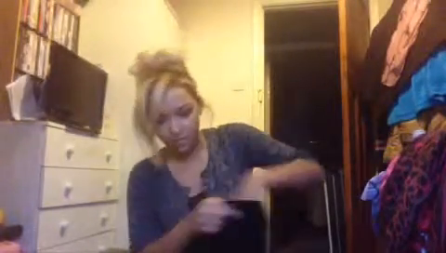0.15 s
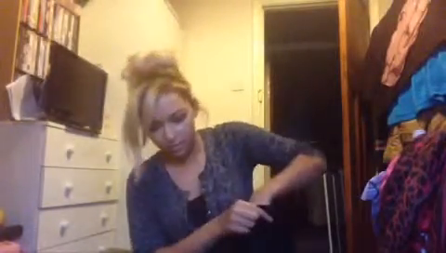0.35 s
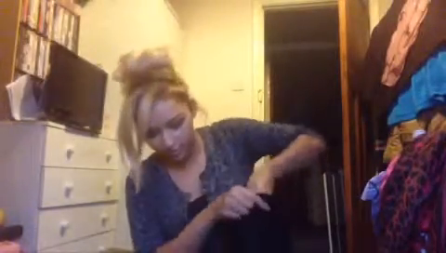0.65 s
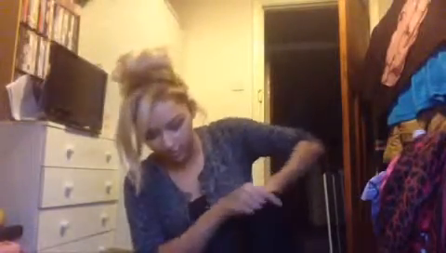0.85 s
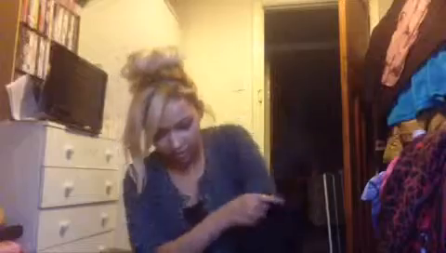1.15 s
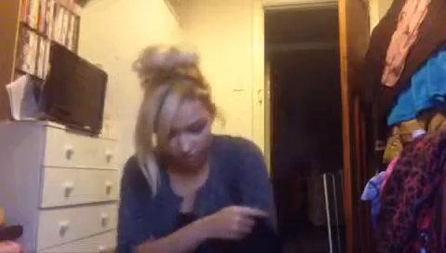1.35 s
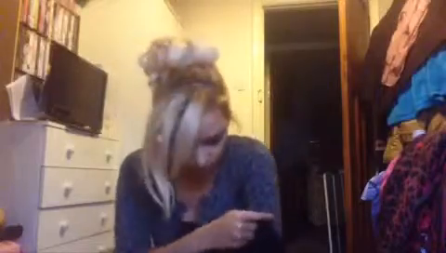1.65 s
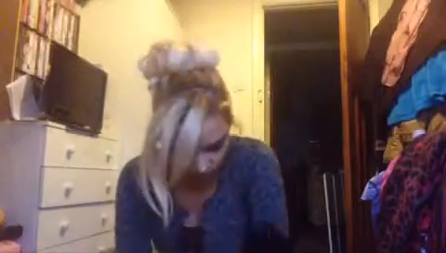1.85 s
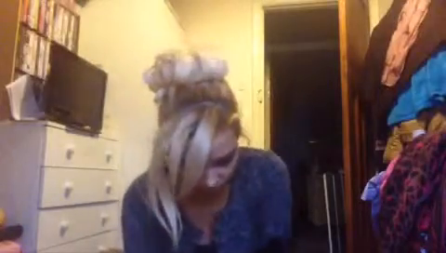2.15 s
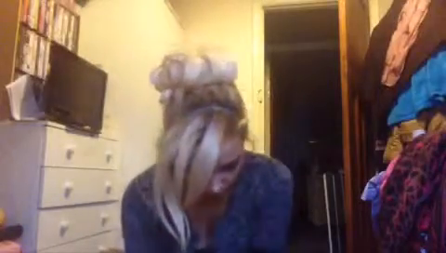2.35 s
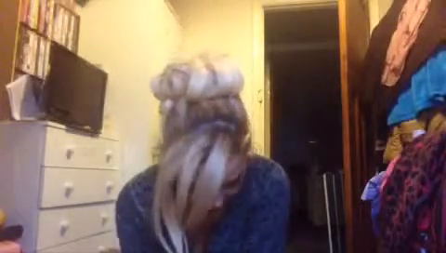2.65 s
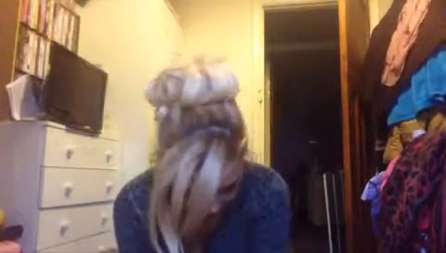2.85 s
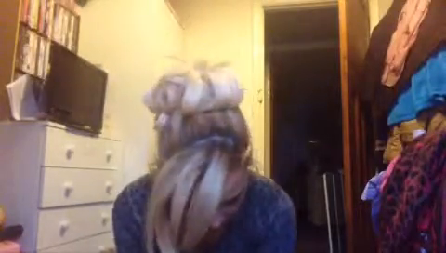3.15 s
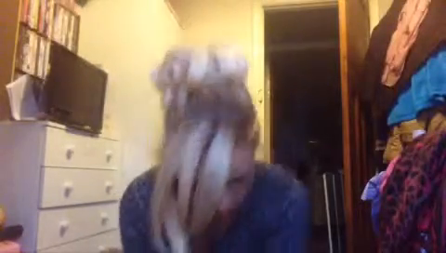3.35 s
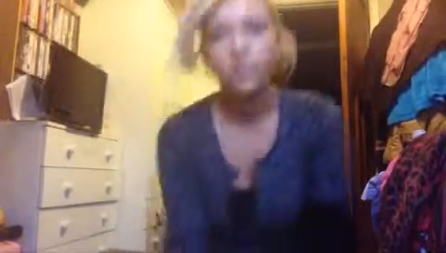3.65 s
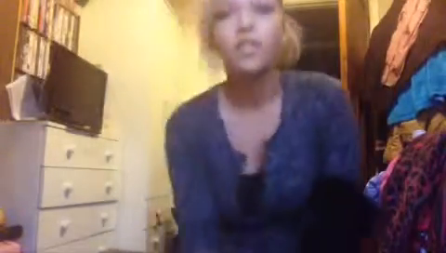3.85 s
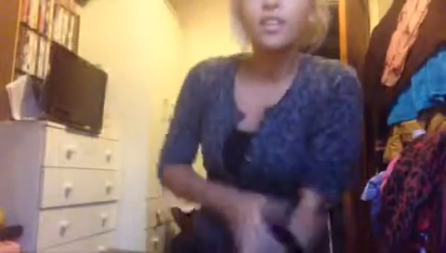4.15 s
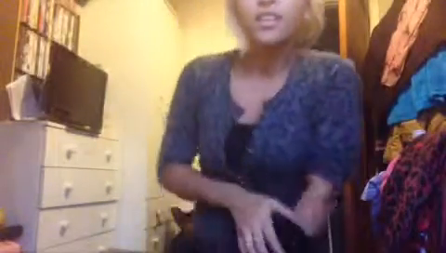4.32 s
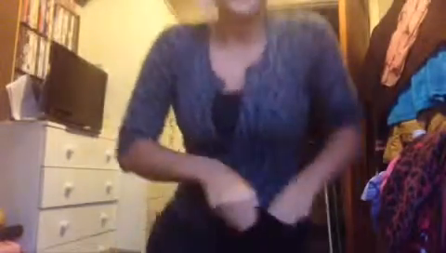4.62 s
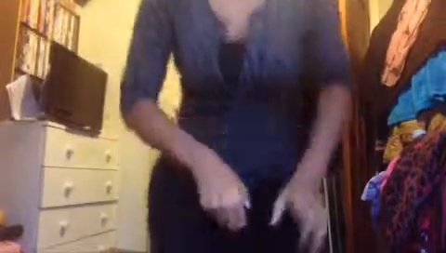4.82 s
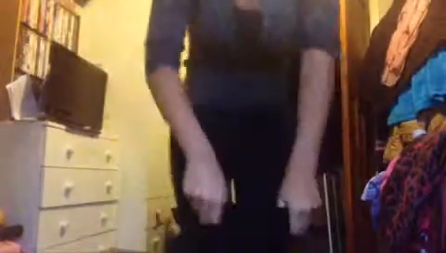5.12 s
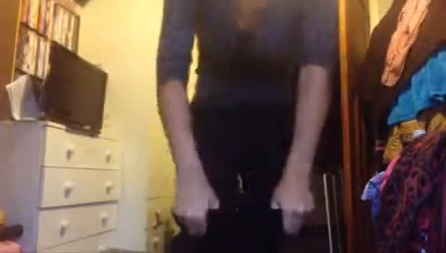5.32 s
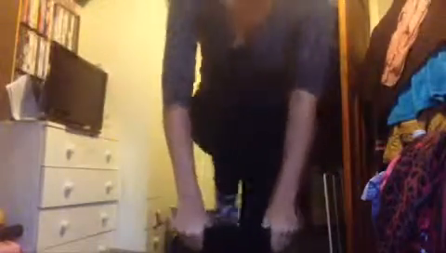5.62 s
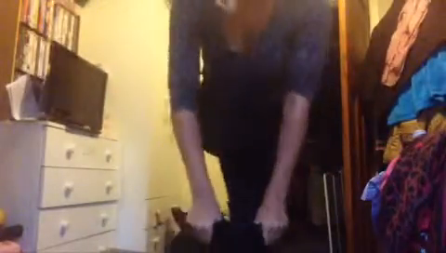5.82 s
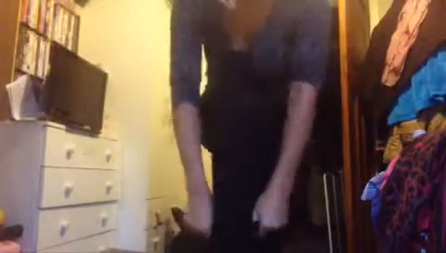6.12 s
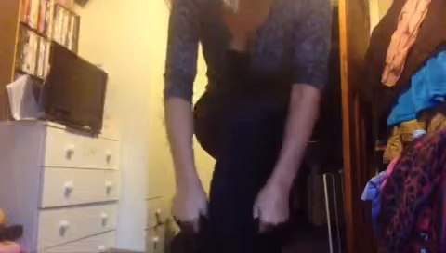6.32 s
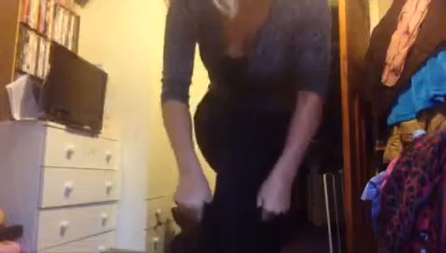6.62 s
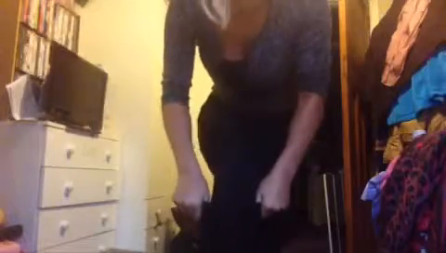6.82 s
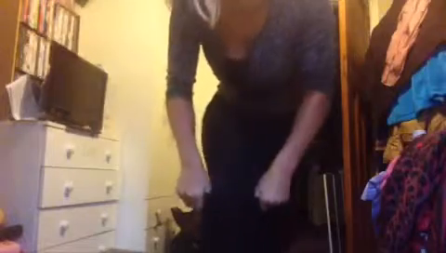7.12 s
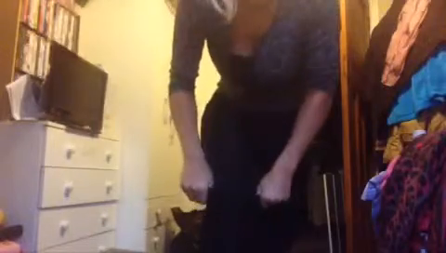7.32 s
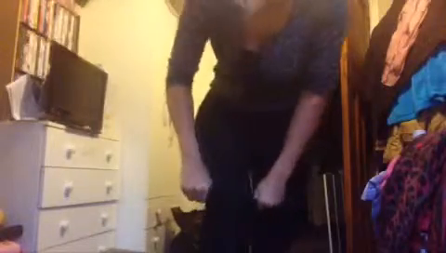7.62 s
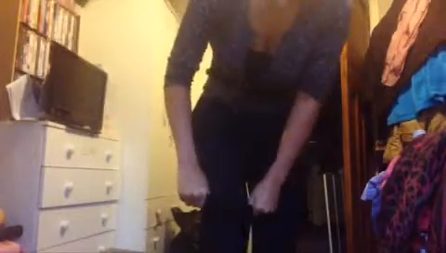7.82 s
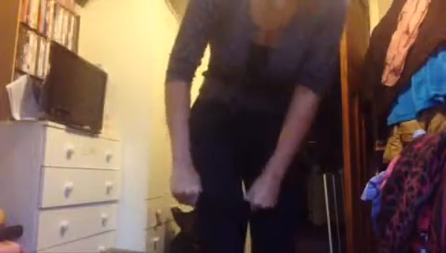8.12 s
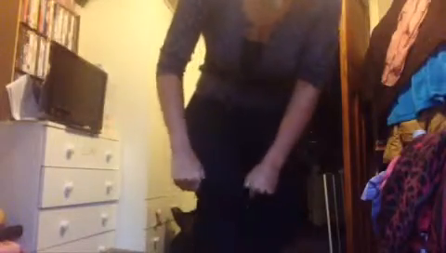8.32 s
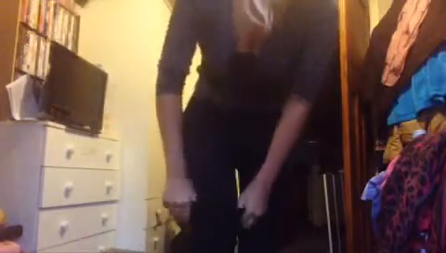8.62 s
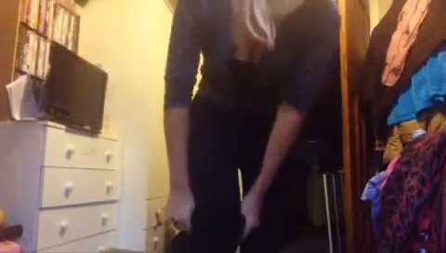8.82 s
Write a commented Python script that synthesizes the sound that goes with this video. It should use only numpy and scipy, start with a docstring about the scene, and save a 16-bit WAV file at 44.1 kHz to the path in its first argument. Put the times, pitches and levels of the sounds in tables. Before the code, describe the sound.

A loud zip rips at once, then cloth rustles and stiff leather creaks with handling knocks, one heavy thud midway and hard knocks later.

```python
"""Someone pulls on boots in a small bedroom, near a built-in microphone that hisses faintly.
From the start cloth and leather rustle and creak (filtered random slips); a zip is ripped along at 0.1 s.
Boot knocks (ringing modes) begin at 0.3 s, high ticks (short sines) at 1.1 s; short zip pulls follow
at 2 s and 3.9 s and a heavy knock at 4.2 s. Rubbing is strongest from 6.1 s, with hard knocks
at 6.9-7.5 s; then cloth and leather go on to the end with a few lighter knocks."""
import sys
import numpy as np
from scipy import signal
from scipy.fft import rfft, irfft, next_fast_len
from scipy.io import wavfile
from scipy.ndimage import uniform_filter1d

SR = 44100
rng = np.random.default_rng(int(sys.argv[2]) if len(sys.argv) > 2 else 0)


def wav_record(signal):
    """Record a signal, one row per channel, as 16-bit PCM in the file named by sys.argv[1]."""
    frames = np.transpose(np.atleast_2d(signal))
    bounded = np.clip(frames, -1, 1)
    # unit amplitude maps onto the largest positive 16-bit level
    quanta = np.round(bounded * 32767).astype(np.int16)
    wavfile.write(sys.argv[1], SR, quanta)


N = 395575

# Cloth strokes: (start [s], swell before it [dB/s], hold [s], rub level [dB], fuzz level [dB])
CLOTH_STROKES = [(0.0, 200, 0.087, -78.5, -76.5), (0.30, 200.5, 0.046, -67, -71),
                 (0.395, 345, 0.0086, -62.5, -57.5), (0.60, 155, 0.097, -72.5, -74.5),
                 (0.82, 200, 0.032, -66, -67), (0.99, 252, 0.11, -62, -64), (1.15, 197, 0.21, -65, -67),
                 (1.50, 120, 0.027, -68, -69), (1.62, 120, 0.055, -66.5, -71),
                 (1.78, 150, 0.092, -69.5, -75.5), (2.15, 131, .40, -67.5, -67.5),
                 (2.55, 102, 0.068, -67.5, -70), (2.71, 120, 0.015, -64.5, -65.5),
                 (2.80, 200, 0.25, -64.5, -66), (3.13, 200, 0.093, -74.5, -74.5),
                 (3.40, 296, 0.011, -69, -75), (3.54, 109, 0.058, -69.5, -62.5),
                 (3.64, 200, 0.049, -63, -68), (3.77, 150, 0.072, -59, -62.5), (4.00, 193, 0.038, -70, -74),
                 (4.18, 96, .05, -61, -65.5), (4.24, 200, 0.031, -60.5, -59),
                 (4.38, 200, 0.031, -65.5, -66), (4.57, 140, .05, -61, -58.5), (4.74, 152, 0.043, -63, -66),
                 (4.89, 150, 0.044, -65.5, -65.5), (4.97, 300, 0.071, -61, -59),
                 (5.13, 200, 0.019, -73, -68.5), (5.24, 200, .17, -73.5, -74),
                 (5.51, 150, 0.024, -76, -71.5), (5.844, 602, 0.024, -65.5, -63),
                 (5.93, 200, .19, -65, -66), (6.144, 450, .20, -54.5, -58.5), (6.38, 200, 0.11, -60, -60.5),
                 (6.55, 55, 0.073, -51.5, -55.5), (6.79, 100, 0.084, -57, -60.5),
                 (6.92, 200, 0.2, -58.5, -62.5), (7.251, 41, .53, -55, -59.5),
                 (7.86, 198, 0.083, -61.5, -66), (8.01, 200, 0.033, -60, -64.5),
                 (8.21, 250, 0.053, -66.5, -70), (8.36, 100, 0.043, -70, -73),
                 (8.479, 500, 0.0059, -68, -68), (8.54, 200, 0.12, -69.5, -75.5),
                 (8.73, 148, 0.032, -65, -63), (8.81, 150, 0.098, -68.5, -67)]
# Cloth spectra, weave and fine fuzz: (frequency [Hz], relative density [dB per Hz])
WEAVE_SPECTRUM = [(410, -20.5), (700, -11.5), (874, 0), (953, -7), (1080, -5), (1510, -6.5), (1780, -3),
                  (2830, -8.5), (3820, -9.5), (7000, -23.5), (9100, -39), (15400, -120)]
FUZZ_SPECTRUM = [(3500, -13.5), (5500, -3), (8000, -3), (11000, -4), (15500, -3.5)]
# Stiff leather flexing: (time [s], rumble level [dB], creak level [dB], boot hollow pitch [Hz])
LEATHER_FLEX = [(0.0, -67, -75, 650), (0.3, -64.5, -73, 600), (0.7, -73, -74.5, 500),
                (1.3, -65.5, -67, 457), (1.55, -59, -65.5, 358), (2.0, -64, -71, 380),
                (2.6, -58, -62.5, 418), (3.1, -65, -76.5, 695), (3.45, -68, -81.5, 423),
                (3.8, -65.5, -66, 640), (4.29, -63, -62.5, 418), (4.5, -68, -69.5, 645),
                (4.95, -64, -62.5, 530), (5.15, -67.5, -74.5, 580), (5.7, -70.5, -77, 520),
                (5.9, -66.5, -64.5, 520), (6.4, -63, -62, 794), (6.6, -63.5, -60.5, 544),
                (6.95, -66, -68, 480), (7.2, -62, -62, 804), (7.7, -65.5, -67.5, 890), (8.1, -68, -76, 560),
                (8.45, -67, -71.5, 470), (8.7, -71, -73, 493), (8.97, -68, -85, 385)]
# Leather spectra, rumble and creak: (frequency [Hz], relative density [dB per Hz])
RUMBLE_SPECTRUM = [(15, -18.5), (25, -10.5), (48, -0.5), (162, -6.5), (199, -1.5), (240, -10), (325, -11),
                   (382, -6.5), (400, -10.5), (520, -21.5), (880, -120)]
CREAK_SPECTRUM = [(150, -46), (250, -3), (383, -10), (469, -3), (515, -1), (640, -2.5), (820, 0),
                  (1210, -12), (1600, -20), (2080, -25), (3520, -120)]
# Microphone hiss: (frequency [Hz], relative density [dB per Hz])
HISS_SPECTRUM = [(18, -66), (30, -32.5), (92, -13.5), (148, -5), (168, -25), (368, -12.5), (574, -24),
                 (671, -16.5), (1190, -34.5), (15400, -52)]
# Quick slider pulls: (time [s], rise [s], run [s], level [dB], fade over run [dB], t60 [s], tilt [dB/octave])
ZIP_PULLS = [(0.096, 0.021, 0.068, -22, -9.5, 0.2, 0), (1.972, 0.0057, 0.0049, -45, -3, 0.062, -4),
             (3.871, 0.018, 0.054, -43, -9.5, 0.12, -1), (3.944, 0.0027, 0.0056, -43, -13, 0.042, -2)]
# Zip teeth: (frequency [Hz], relative density before tilt [dB per Hz])
ZIP_SPECTRUM = [(59, -6.5), (100, -25.5), (192, 0.5), (332, -17.5), (496, 0), (710, -9.5), (1060, -4),
                (1520, -11), (1790, -2), (2460, -10), (2620, -6.5), (2790, -8), (6770, -5.5), (14500, -10),
                (15400, -15)]
# Boot on floor: (time [s], peak [dB], blow centre [Hz], fall below it [dB/octave], fall above it [dB/octave])
FLOOR_KNOCKS = [(0.3189, -47, 574, 18, 9), (0.83, -46, 650, 6.7, 3), (1.0559, -39, 464, 2, 6.5),
                (1.091, -43, 197, 4.3, 2.4), (1.3245, -48, 447, 2.8, 5), (1.4401, -44, 394, 10, 3.9),
                (1.5186, -42, 352, 15, 20), (1.6881, -45.5, 1250, 6.3, 9), (1.7641, -36.5, 378, 32, 6.3),
                (1.824, -50, 312, 11, 6.5), (1.982, -52, 210, 8, 5), (2.0146, -46.5, 543, 11, 6.5),
                (2.0967, -44.5, 348, 2.8, 19), (2.144, -43.5, 400, 2.3, 3.6), (2.3609, -42, 550, 8.8, 6.9),
                (2.3826, -41, 1740, 3.3, 6.5), (2.454, -49, 171, 7.9, 9.3), (2.4884, -44.5, 795, 3, 1.1667),
                (2.54, -47.5, 600, 8, 9), (2.6147, -50, 230, 6, 13), (2.7194, -35, 170.4, 20, 7.2),
                (2.7278, -38, 890, 5.1, 13), (2.8005, -43.5, 520, 4.6, 8.6), (2.879, -49, 150, 7, 8.1),
                (2.9486, -33.5, 880, 17, 15), (3.049, -34.5, 1130, 4, 3.8), (3.053, -42.5, 165, 12, 11),
                (3.4073, -50.5, 313, 3.2, 6.2), (3.6592, -53, 403, 3.5, 5.4), (3.7623, -43, 165, 7, 3.8),
                (3.8338, -40, 855, 5, 8), (4.208, -17, 137, 6.4, 8.5), (4.2282, -27, 1060, 3.4, 20),
                (4.377, -46.5, 376, 2, 4.3), (4.3999, -43, 910, 4, 12), (4.955, -41.5, 535, 6.2, 8),
                (5.1691, -50, 600, 6.5, 5), (5.4731, -50.5, 217, 5, 6.8), (5.7049, -43, 675, 32, 30),
                (5.838, -46.5, 484, 4, 17), (5.866, -43, 348, 2.6, 8.8), (5.9065, -40, 615, 18, 16),
                (6.0675, -43.5, 145, 1.4, 2.2), (6.231, -41.5, 226, 2.3, 2.4), (6.2576, -39, 676, 8.2, 9.2),
                (6.5445, -39, 586, 4.5, 13), (6.585, -37, 705, 2.3, 8), (6.743, -46, 118, 4.4, 19),
                (6.7963, -34, 360, 2, 4.6), (6.8537, -21.5, 520, 6.4, 2.3), (6.858, -36.5, 97, 17, 11),
                (7.076, -38.5, 775, 12, 4.8), (7.166, -36.5, 830, 8.6, 11), (7.271, -43, 1196, 12, 9),
                (7.3279, -25.5, 513, 3, 6.9), (7.4641, -26.5, 496, 3.5, 11.4), (7.505, -41.5, 203, 12, 16),
                (7.965, -48, 195, 7, 7.2), (8.2113, -50.5, 198, 9, 6), (8.498, -36, 490, 1.1, 11.5)]
# Ringing of boot and floor: (frequency [Hz], level [dB], t60 before stretch and cap [s])
BOOT_MODES = [(53.7, 3, 0.75), (98, -8, 0.21), (131.5, -1.5, 0.21), (154.8, -1.5, 0.11), (209.6, 9, 0.057),
              (313.4, 4, 0.054), (400, 7, 0.052), (495.4, -0.5, 0.07), (546, -2, 0.068), (710, 7, 0.026),
              (795, -3, 0.094), (893, 4.5, 0.039), (970, 0, 0.054), (1182, 4.5, 0.017), (1610, 5.5, 0.016),
              (1805, -2, 0.051), (2120, -2.5, 0.058), (3300, -12, .03)]
# High ticks: (time [s], level before the 4 dB cut in tick() [dB], pitch [Hz])
HIGH_TICKS = [(1.0994, -45, 6350), (1.978, -43.5, 6900), (2.3835, -34.5, 1900), (6.8541, -24, 1820),
              (6.855, -36, 3920)]
# Decay of the bedroom: (frequency [Hz], t60 [s])
ROOM_DECAY = [(100, 0.35), (500, 0.11), (2000, 0.25), (8000, 0.23)]

REST_RUB_DB, REST_FUZZ_DB = -86, -82.5  # clothes never lie quite still
EBB_DB_PER_S = 152
HISS_DB = -70.5
T60_STRETCH = 1.16
REFLECTIONS_DB = -10.0
BASS_CUT_HZ, BAND_EDGE_HZ = 38, 15400


def gain_of(db):
    """Decibels to an amplitude factor."""
    return 10 ** (np.asarray(db) / 20)


def evened(x):
    """Scales to rms 1."""
    return x / np.sqrt(np.mean(x ** 2) + 1e-20)


def along(rows):
    """Interpolates table columns over time, one value a sample."""
    time_s, *columns = np.transpose(rows)
    return [np.interp(np.arange(N) / SR, time_s, column) for column in columns]


def coloured(x, spectrum, tilt_db=0.):
    """Filters to rms 1 by a spectrum, 90 dB down outside its ends; tilt is per octave about 4 kHz."""
    point_hz, point_db = np.transpose(spectrum)
    size = next_fast_len(len(x))
    hz = np.fft.rfftfreq(size, 1 / SR) + 1  # keeps the logarithm finite
    db = np.interp(np.log(hz), np.log(point_hz), point_db, -90, -90)
    db = db + tilt_db * np.log2(hz / 4000)
    return evened(irfft(rfft(x, size) * gain_of(db), size)[:len(x)])


def add(mix, time_s, sound):
    """Mixes a sound in at a time."""
    part = mix[round(time_s * SR):][:len(sound)]
    part += sound[:len(part)]


def slips(size, per_s, spread_db):
    """Random slips of either sign: most are small, a few are large."""
    chance = rng.random(size)
    sized_sign = rng.standard_normal(size)
    force = rng.exponential(1, size)
    return (chance < per_s / SR) * sized_sign * gain_of(spread_db * np.minimum(force, 5))


def flutter(span_s, depth_db):
    """Unsteady gain: noise averaged twice over the span, depth in dB rms."""
    span = max(round(span_s * SR), 1)
    wander = uniform_filter1d(uniform_filter1d(rng.standard_normal(N), span), span)
    return gain_of(depth_db * evened(wander))


def strokes():
    """Rub and fuzz gains: each stroke swells, holds and ebbs; their powers add."""
    t = np.arange(0, N / SR + .01, .002)
    start_s, swell_db_per_s, hold_s, *levels_db = np.transpose(CLOTH_STROKES)[:, :, None]
    swell_db = -swell_db_per_s * np.maximum(start_s - t, 0)
    ebb_db = -EBB_DB_PER_S * np.maximum(t - start_s - hold_s, 0)
    gains = []
    for level_db, rest_db in zip(levels_db, (REST_RUB_DB, REST_FUZZ_DB)):
        power = (gain_of(level_db + swell_db + ebb_db) ** 2).sum(0) + gain_of(rest_db) ** 2
        gains.append(np.interp(np.arange(N) / SR, t, np.sqrt(power)))
    return gains


def patchy(x, depth_db):
    """Random patches of the spectrum, some 500 Hz wide and 60 ms long, lift and sink: uneven rustle."""
    z = signal.stft(x, nperseg=512, noverlap=384)[2]
    patches = uniform_filter1d(uniform_filter1d(rng.standard_normal(z.shape), 6, 0), 20, 1)
    z = z * gain_of(depth_db * evened(patches))
    return evened(signal.istft(z, nperseg=512, noverlap=384)[1][:N])


def cloth():
    """Fibres catch and let go thousands of times a second; the pressure of the hand is uneven."""
    rub_gain, fuzz_gain = strokes()
    fibres = patchy(slips(N, 12000, .8) + 1.16 * rng.standard_normal(N), 1.5)
    weave = coloured(fibres, WEAVE_SPECTRUM) * flutter(.012, 0.9) * rub_gain
    fuzz = coloured(fibres, FUZZ_SPECTRUM) * fuzz_gain
    pressure = flutter(0.023, 1.0)
    return pressure * (weave + fuzz)


def resonate(x, hz, width_hz):
    """A two-pole resonance, rms 1, that follows the curve hz."""
    turn = np.exp(2j * np.pi * np.cumsum(hz) / SR)
    r = np.exp(-np.pi * width_hz / SR)
    at_zero_hz = signal.lfilter([1, 0], np.convolve([1, -r], [1, -r]), x / turn)
    return evened((turn * at_zero_hz).real)


def leather():
    """Sparse, dull slips shake the boot shaft; quicker ones make it creak in its hollow."""
    rumble_db, creak_db, hollow_hz = along(LEATHER_FLEX)
    rumble = evened(coloured(slips(N, 300, 0.88), RUMBLE_SPECTRUM) * flutter(.023, 1.5))
    grip = slips(N, 1200, 1.8) * flutter(.03, 2.2)
    creak = evened(coloured(grip, CREAK_SPECTRUM) + 0.33 * resonate(grip, hollow_hz, 190))
    return gain_of(rumble_db) * rumble + gain_of(creak_db) * creak


def microphone_hiss():
    """Steady coloured noise of the microphone."""
    return gain_of(HISS_DB) * coloured(rng.standard_normal(N), HISS_SPECTRUM)


def pull(time_s, rise_s, run_s, level_db, fade_db, t60_s, tilt_db):
    """Teeth snap through the slider too fast to count, then the rasp dies away."""
    t = np.arange(SR // 2) / SR
    teeth = coloured(slips(len(t), 25000, 1.0), ZIP_SPECTRUM, tilt_db)
    run_fade_db = fade_db * np.clip(t / run_s, 0, 1)
    decay_db = -60 * np.maximum(t - run_s, 0) / t60_s
    onset = np.clip(.07 + .93 * (t / rise_s) ** 1.6, 0, 1)  # the slider gathers speed
    return time_s, gain_of(level_db + run_fade_db + decay_db) * onset * teeth


def knock(time_s, peak_db, blow_hz, below_db, above_db):
    """A blow wakes the modes near its own pitch; each lands a little differently."""
    t = np.arange(SR // 5) / SR
    hz, mode_db, t60_s = np.transpose(BOOT_MODES)[:, :, None]
    near_db = -abs(np.log2(hz / blow_hz)) * np.where(hz < blow_hz, below_db, above_db)
    # random spread of each mode: 1.5 dB in level, 1.2 % in pitch
    spot_db, detune = rng.standard_normal((2, len(hz), 1)) * [[[1.5]], [[.012]]]
    # leather damps every mode within ninety swings, and within 0.17 s
    t60_s = np.minimum(t60_s * T60_STRETCH, np.minimum(90 / hz, .17))
    build = 1 - np.exp(-t * hz * 1.8)  # low modes take longer to get going
    ring_gain = build * gain_of(mode_db + near_db + spot_db - 60 * t / t60_s)
    modes = -(ring_gain * np.sin(2 * np.pi * hz * (1 + detune) * t)).sum(0)
    # the contact itself, losing 9 dB a cycle
    contact_gain = gain_of(-9. * blow_hz * t) * (1 - np.exp(-t * blow_hz * 1.07))
    contact = -np.sin(2 * np.pi * blow_hz * t) * contact_gain
    sound = modes / abs(modes).max() + 3.14 * contact
    return time_s, gain_of(peak_db) * sound / abs(sound).max()


def tick(time_s, level_db, hz):
    """A short bright tick, some of them the snap on top of a knock: two sines with a t60 of 11 ms."""
    t = np.arange(1000) / SR
    pair = np.sin(2 * np.pi * hz * t) + 0.38 * np.sin(2 * np.pi * 1.35 * hz * t)
    return time_s, gain_of(level_db - 4 - 60 * t / 0.011) * pair


def bedroom(x):
    """Sparse reflections of random sign, each band dying at its own speed."""
    taps = np.zeros(SR // 2)
    at = np.arange(200, len(taps) - 20, 20)  # one tap in every 20 samples
    taps[at + rng.integers(0, 20, len(at))] = rng.choice([-1., 1.], len(at))
    hz, t, z = signal.stft(taps, SR, nperseg=256)
    room_hz, room_t60_s = np.transpose(ROOM_DECAY)
    t60_s = np.interp(hz, room_hz, room_t60_s)[:, None]
    tail = signal.istft(z * gain_of(-60 * t / t60_s), SR, nperseg=256)[1]
    return signal.fftconvolve(x, tail / np.linalg.norm(tail))[:N]


def scene():
    """Pulls, knocks and ticks with their reflections, over rustle and hiss."""
    hits = np.zeros(N)
    for source, rows in ((pull, ZIP_PULLS), (knock, FLOOR_KNOCKS), (tick, HIGH_TICKS)):
        for row in rows:
            add(hits, *source(*row))
    reflections = gain_of(REFLECTIONS_DB) * bedroom(hits)
    return (cloth() + leather() + microphone_hiss() + hits + reflections)[None]


def record(dry):
    """A small microphone loses the deepest bass; then the band limit."""
    bass_cut = signal.butter(2, BASS_CUT_HZ, "high", fs=SR, output="sos")
    thin = signal.sosfilt(bass_cut, dry)
    band_limit = signal.firwin(511, BAND_EDGE_HZ, window=("kaiser", 9), fs=SR)
    return signal.oaconvolve(thin, band_limit[None], "same")


dry = scene()
out = record(dry)
wav_record(out)
```